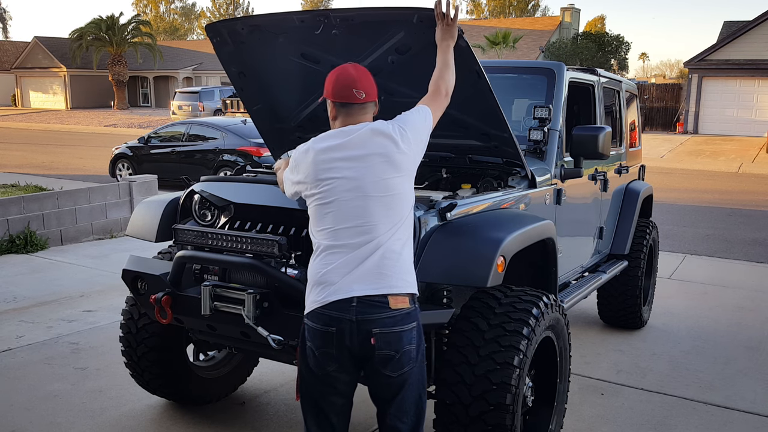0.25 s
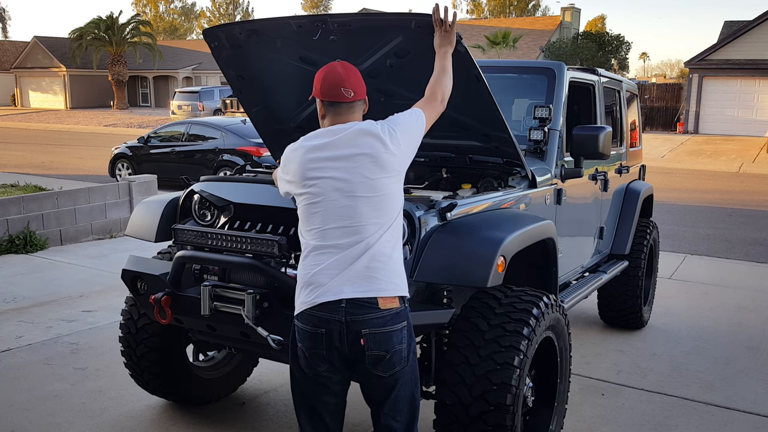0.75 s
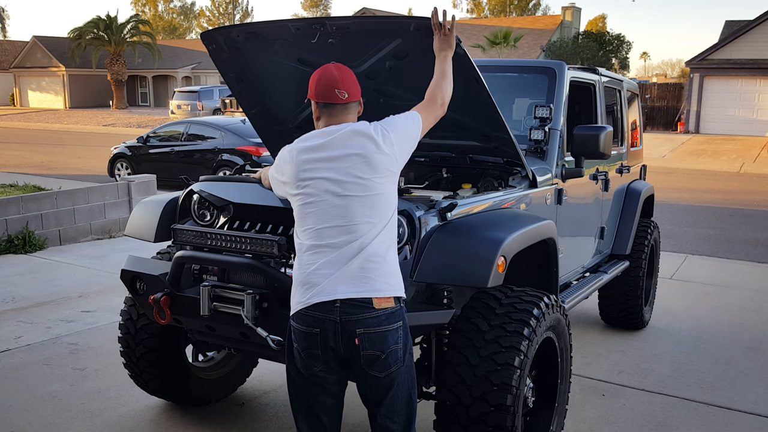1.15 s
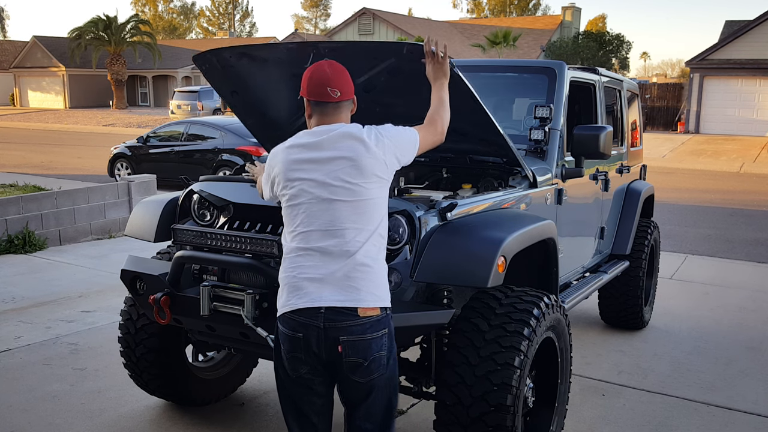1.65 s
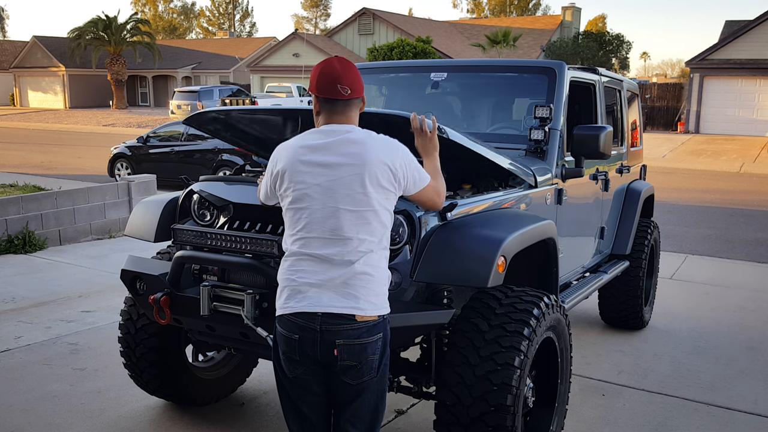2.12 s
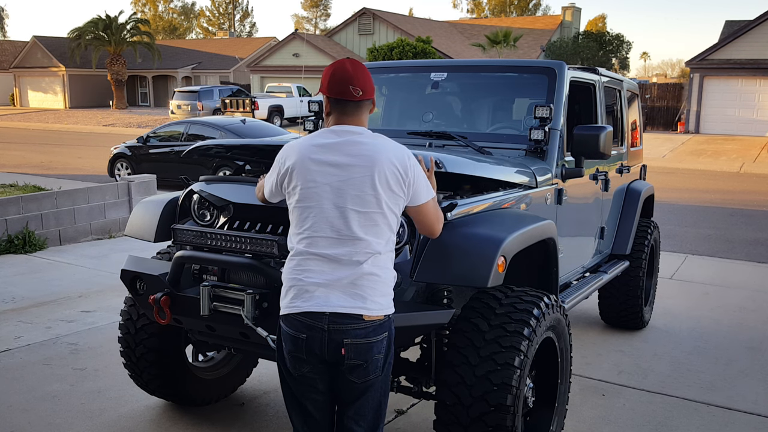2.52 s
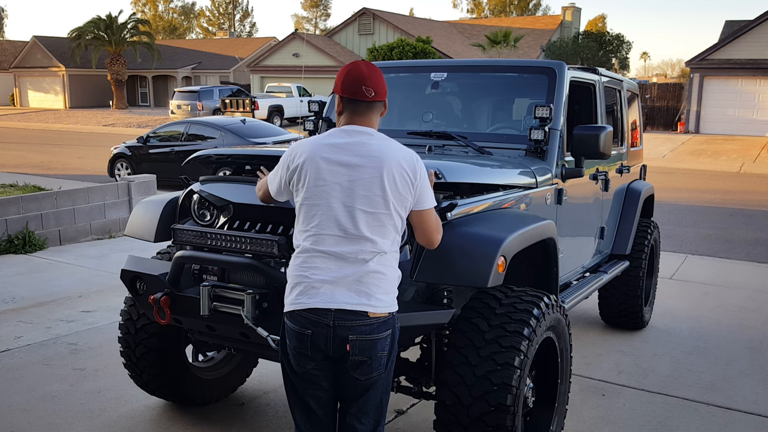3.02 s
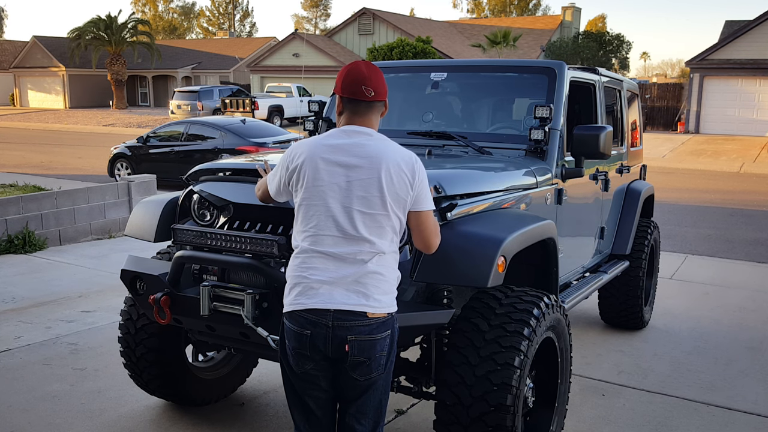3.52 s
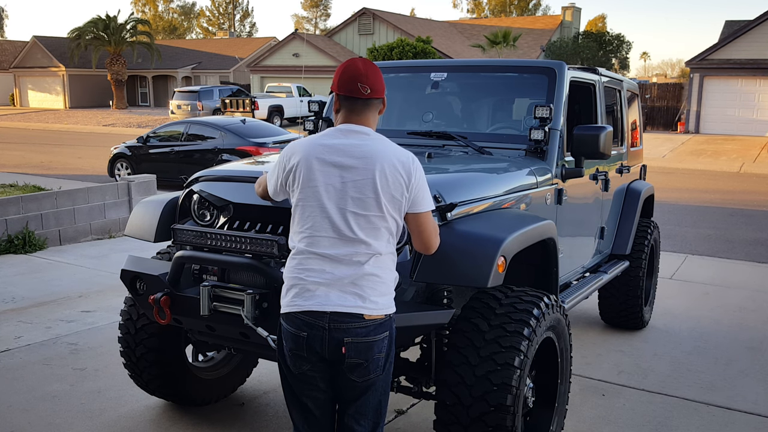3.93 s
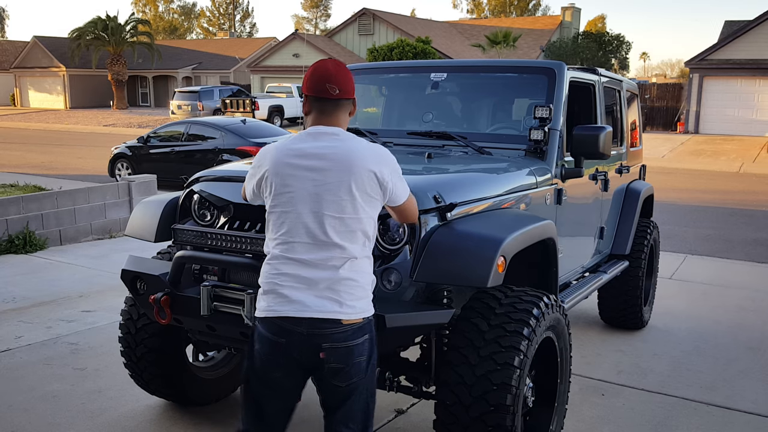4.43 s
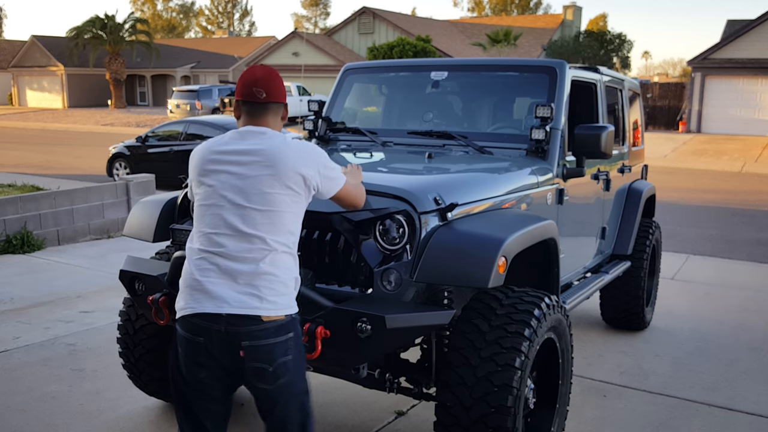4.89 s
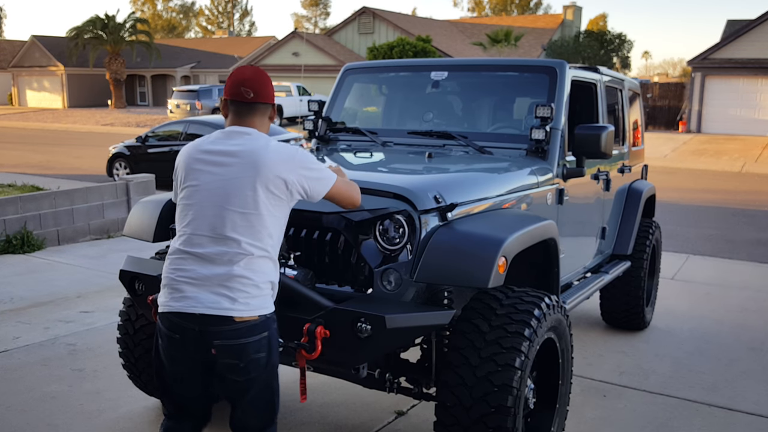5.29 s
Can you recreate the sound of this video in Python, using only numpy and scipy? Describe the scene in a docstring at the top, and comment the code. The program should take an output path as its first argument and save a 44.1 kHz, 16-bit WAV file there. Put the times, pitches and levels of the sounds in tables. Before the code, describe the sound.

On a quiet suburban driveway, light metal handling noises lead to the bright clank of a hood's prop rod. About two seconds later the car hood slams shut, latching with a deep thud and a brief rebound. Shoes scuff softly, clothing rustles faintly and a hand knocks lightly on the hood. The sounds are fairly close, with short reflections from house walls and a low hum of far traffic.

```python
"""Closing a car hood on a driveway

A man unhooks the steel prop rod and drops it with a clank. The hood falls, hits the latch and booms on
its rubber stops. He shifts his feet and knocks lightly on the hood. Each blow is ringing metal modes
plus a noise clatter. House walls scatter the sound over the traffic murmur of a quiet suburb."""
import sys
import numpy as np
from scipy import signal
from scipy.fft import rfft, irfft, next_fast_len
from scipy.io import wavfile
from scipy.ndimage import uniform_filter1d

SR = 44100
rng = np.random.default_rng(int(sys.argv[2]) if len(sys.argv) > 2 else 0)


def master(y):
    """Save y as 16-bit WAV."""
    cut = np.clip(np.atleast_2d(y).T, -1, 1)
    pcm = np.round(cut * 32767)  # scale
    wavfile.write(sys.argv[1], SR, pcm.astype(np.int16))


N = 244843
TIME_S = np.arange(N) / SR
RING_S = np.arange(SR) / SR
STEPS_FROM_S, STEPS_TO_S = 3.9, 5.5

# Impacts. Each row: start in seconds, clatter level in dB, ring level in dB, low-pass cutoff in Hz.
HOOD_HITS = [(3.6215, -27.5, -32.5, 12000), (3.639, -32.5, -38.5, 500), (3.7055, -40.5, -49.5, 4000),
             (3.748, -40.5, -55, 490), (3.785, -52.5, -68, 700)]
LATCH_HITS = [(3.5705, -34.5, -36, 16000), (3.575, -30, -68, 16000), (3.588, -29, -47, 3030)]
ROD_HITS = [(1.3692, -39, -69, 16000), (1.3713, -20.5, -29.5, 12000), (1.3765, -26.5, -59, 15000),
            (1.3815, -26, -59, 9000), (1.408, -31, -74, 7000), (1.437, -36, -53, 3000)]
KNOCK_HITS = [(5.071, -55.5, -76, 16000), (5.0895, -43.5, -42, 12000), (5.099, -48, -48.5, 8000),
              (5.112, -44.5, -60, 8000), (5.142, -51.5, -69, 8000)]
# Modes of the struck metal. Each row: frequency in Hz, relative level in dB, T60 in seconds.
HOOD_RESONANCES = [(54, -26, 0.74), (106.8, -19, 0.49), (160.4, -12.5, 0.56), (186, -12, 0.35),
                   (242, -12.5, 0.65), (280, -4, 0.12), (382.3, -9, 0.46), (458.5, -3.5, 0.28),
                   (525, -7, 0.12), (570, -3, 0.11), (632, -0.5, 0.2), (700, -26, 0.15), (896, -9.5, 0.23),
                   (1390, -21, 0.2), (3100, -16, 0.11), (4500, -17.5, .15)]
LATCH_RESONANCES = [(106.9, -10.5, 0.92), (150, -35, .2), (275.6, -4, 0.41), (547, 10, 0.076),
                    (703, -1.5, 0.27), (1280, -9, 0.082), (1300, -13, 0.14), (2050, -3.5, 0.091),
                    (2370, -17, .15), (3160, -15, 0.18), (4160, -9, 0.12), (4500, -11, 0.17),
                    (4680, -12.5, 0.18)]
ROD_RESONANCES = [(112, -14, 0.31), (142.4, -4.5, 0.16), (159.4, -3.5, 0.42), (183, -13, 0.47),
                  (227, -13.5, 0.49), (262, 0, 0.16), (355, 0.5, 0.23), (415.6, -12, 0.59), (448, -6, 0.33),
                  (577, -12, 0.19), (773, -10, 0.16), (926, -13, 0.21), (1047, -15, 0.22),
                  (1537, 5.5, 0.035), (1610, -13, 0.12), (1870, -8, 0.15), (1885, 0, 0.091),
                  (2218, 7, 0.064), (2630, -29, 0.23), (2940, -7, 0.12), (3055, -10, 0.17),
                  (4080, -28, 0.18), (4730, -16, 0.15), (6800, -16, .11), (7700, -20, 0.087)]
KNOCK_RESONANCES = [(167, -7, 0.084), (256, -0.5, 0.2), (370, 0.5, 0.086), (820, -19, 0.11),
                    (1018, -7, 0.16), (1276, 0.5, 0.11), (1490, 0.5, 0.076), (1690, -5, 0.072),
                    (1880, -9.5, 0.14)]
# Dense, short vibration of each contact. Each row: frequency in Hz, relative density in dB.
HOOD_SPECTRUM = [(47, -48), (80, -42), (107, -14), (241, -19.5), (314, -3), (391, -15.5), (456, -9.5),
                 (649, -15), (725, -20), (903, -21), (1310, -26.5), (15500, -60)]
LATCH_SPECTRUM = [(59, -39), (100, -17), (166, -31), (306, -12), (429, -15.5), (712, -3.5), (977, -23.5),
                  (1260, -11), (1690, -19), (2130, -16.5), (2690, -24), (5400, -25), (8410, -26),
                  (9950, -39.5), (15500, -33)]
ROD_SPECTRUM = [(70, -9), (110, -5), (150, -2.5), (270, -6), (450, -9), (650, -9), (900, -11), (1150, -15),
                (1500, -10), (2150, -11), (3800, -21), (8300, -25.5), (9700, -37.5), (15500, -29)]
KNOCK_SPECTRUM = [(59, -55), (100, -28), (184, -8), (275, -14), (319, -18), (378, -8), (438, -9.5),
                  (1040, -6), (1180, -11), (1290, -4), (2470, -14.5), (5280, -25), (8230, -21.5),
                  (15500, -42)]
TICK_SPECTRUM = [(500, -16), (1500, -1), (2700, 1.5), (4800, -5.5), (7000, -3), (8500, 1), (10000, -16),
                 (15500, -16)]
# Stereo balance. Each row: frequency in Hz, left over right in dB.
HOOD_PAN = [(60, 1.0), (110, 1.0), (200, 1.6), (380, 0.5), (700, 2.6), (1290, 3.0), (2380, 7.5),
            (4400, 0.5), (8120, 3.5), (15000, 4.5)]
ROD_PAN = [(60, -5), (110, 3), (200, 0.5), (380, 1), (700, 2.5), (1290, 8), (2380, 3), (4400, -2.5),
           (8120, 11), (15000, 4)]
KNOCK_PAN = [(60, 1.0), (110, 2.0), (200, 0.5), (380, 5.3), (700, 1.8), (1290, 4.3), (2380, 3.6),
             (4400, 1.7), (8120, 4.4), (15000, 4.0)]
# Hollow clunks of rod, hinges and panel. Each row: start in seconds, body level in dB,
# body centre in Hz, contact level in dB, T60 in seconds.
HANDLING_CLUNKS = [(.607, -52, 282, -63, .14), (.752, -49, 490, -59.5, 0.16), (.841, -43, 585, -55, .1),
                   (1.259, -51, 566, -79, .11), (2.918, -52, 427, -59, 0.046), (2.93, -52, 447, -57, .045),
                   (4.31, -59, 550, -70, .13), (4.654, -49.5, 580, -68, 0.057),
                   (5.314, -52, 560, -66, 0.14)]
# Scuffs of hands and soles. Each row: start in seconds, level in dB, centre in Hz, T60 in seconds.
HAND_SOLE_SCUFFS = [(.63, -55.5, 740, 0.18), (.945, -52.5, 1100, 0.1), (1.738, -58.5, 950, 0.32),
                    (1.783, -60, 1290, 0.15), (4.123, -61, 1260, .13), (4.367, -63, 1600, .08),
                    (4.542, -51.5, 1020, 0.099)]
# Metal rubbing on metal. Each row: start in seconds, level in dB, centre in Hz.
METAL_SQUEAKS = [(1.681, -59.5, 2580), (3.625, -45, 3200), (5.072, -54.5, 2080)]
# Ticks of small metal parts. Each row: start in seconds, level in dB.
METAL_TICKS = [(.838, -59), (1.541, -59), (1.577, -61), (3.204, -54.5), (4.593, -54.5), (4.613, -55.5),
               (4.862, -64), (5.407, -61)]
# Arm and body movements. Each row: peak time in seconds, swish level in dB.
BODY_MOVES = [(.01, -69.5), (.17, -65), (.33, -70), (.97, -65), (1.78, -65), (2.29, -72.5), (3.22, -67),
              (3.42, -68), (4.6, -66), (4.86, -66), (5.28, -64.5)]
# Distant traffic and hiss. Each row: frequency in Hz, relative density in dB.
SUBURB_SPECTRUM = [(15, -42), (25, -19.5), (48, -7), (69, -5), (133, -2.5), (164, -4.5), (198, -4),
                   (227, -10), (399, -10.5), (482, -11.5), (537, -12), (703, -12.5), (1380, -24.5),
                   (10400, -42.5), (15500, -35.5)]
# Left-right likeness of diffuse sound. Each row: frequency in Hz, coherence from 0 to 1.
DIFFUSE_COHERENCE = [(50, 1), (130, 0.93), (250, 0.93), (500, 0.56), (1000, 0), (2000, 0)]
# Rubbing cloth and scattered sound. Each row: frequency in Hz, relative density in dB.
CLOTH_SPECTRUM = [(200, -4), (700, 3), (2200, 1), (4500, -10.5), (8500, -9), (10000, -20.5), (15000, -21)]
SCATTER_SPECTRUM = [(60, -5.5), (200, -5.5), (600, -2.5), (2000, -3.5), (8000, 1.5), (15000, 2)]


def hood_slam():
    """The sheet-metal hood lands and rebounds, ringing its panel modes."""
    return strike(HOOD_HITS, HOOD_RESONANCES, HOOD_SPECTRUM, HOOD_PAN,
                  clatter_t60_s=0.29, direct=0.21, bass_lag_s=0.0037, highpass_hz=45)


def hood_booms():
    """The panel drums on its stops, weaker each rebound; pitch sags as the steel relaxes."""
    start_s, length_s, rebound_s = 3.629, 0.066, 0.058
    drum_hz, first_db, loss_db = 317.5, -24, 15
    progress = np.clip(RING_S / length_s, 0, 1)
    pitch_hz = drum_hz * (1 + 0.019 * (0.5 - progress))
    envelope = np.abs(np.sin(np.pi * progress)) ** 0.83
    boom = envelope * np.sin(2 * np.pi * np.cumsum(pitch_hz) / SR)
    out = np.zeros((2, N))
    for k in range(3):
        add(out, start_s + k * rebound_s, gain(first_db - k * loss_db) * boom)
    return out


def latch_hit():
    """The falling hood strikes the latch."""
    return strike(LATCH_HITS, LATCH_RESONANCES, LATCH_SPECTRUM, HOOD_PAN,
                  clatter_t60_s=0.11, direct=0.21, bass_lag_s=0.0029, highpass_hz=102)


def rod_drop():
    """The steel rod bounces on the front frame; both ring."""
    return strike(ROD_HITS, ROD_RESONANCES, ROD_SPECTRUM, ROD_PAN,
                  clatter_t60_s=0.11, direct=0.55, bass_lag_s=0.0088, highpass_hz=97.6)


def hand_knock():
    """A hand lightly rings the hood's front edge."""
    return strike(KNOCK_HITS, KNOCK_RESONANCES, KNOCK_SPECTRUM, KNOCK_PAN,
                  clatter_t60_s=0.16, direct=0.13, bass_lag_s=0.0023, highpass_hz=90)


def strike(hits, modes, spectrum, balance, clatter_t60_s, direct, bass_lag_s, highpass_hz):
    """Each hit excites clear modes and a dense clatter; softer contact passes less treble."""
    # Adjacent modes swing in opposite directions.
    ring = sum((-1) ** k * gain(db) * decay(t60_s) * np.sin(2 * np.pi * hz * RING_S)
               for k, (hz, db, t60_s) in enumerate(modes))
    ring *= attack(0.0024)
    out = np.zeros((2, N))
    for start_s, clatter_db, ring_db, cutoff_hz in hits:
        clatter = noise(spectrum, SR, direct) * decay(clatter_t60_s) * attack(0.00015)
        hit = gain(clatter_db) * clatter + gain(ring_db) * ring
        add(out, start_s, signal.lfilter(*signal.butter(2, cutoff_hz, fs=SR), hit))
    # A panel radiates little below its lowest mode.
    out = signal.sosfilt(signal.butter(3, highpass_hz, "high", fs=SR, output="sos"), out)
    # Long bending waves travel slowly, so the bass lags.
    size = next_fast_len(N)
    hz = np.fft.rfftfreq(size, 1 / SR)
    lag_s = bass_lag_s / (1 + (hz / 260) ** 4)
    dispersion = np.exp(-2j * np.pi * np.cumsum(lag_s) * SR / size)
    return irfft(pan(rfft(out, size) * dispersion, log_interp(balance, hz)), size)[:, :N]


def handling():
    """Light contacts as noise bursts: clunks, scuffs, squeaks, ticks and grit underfoot."""
    out = np.zeros((2, N))
    for start_s, body_db, hz, contact_db, t60_s in HANDLING_CLUNKS:
        add(out, start_s, gain(body_db) * burst(hz, t60_s, width_oct=0.48, direct=0.66))
        add(out, start_s, gain(contact_db) * burst(1490, t60_s, width_oct=0.7, direct=0.4))
    for start_s, db, hz, t60_s in HAND_SOLE_SCUFFS:
        add(out, start_s, gain(db) * burst(hz, t60_s, width_oct=0.62, direct=0.35))
    for start_s, db, hz in METAL_SQUEAKS:
        add(out, start_s, gain(db) * burst(hz, t60_s=0.089, width_oct=0.13, direct=0.94))
    grit = [(STEPS_FROM_S + when * (STEPS_TO_S - STEPS_FROM_S), -66 - 8 * weakness)
            for when, weakness in rng.random((6, 2))]
    for start_s, db in list(METAL_TICKS) + grit:
        add(out, start_s, gain(db) * noise(TICK_SPECTRUM, SR, direct=0.2) * decay(t60_s=0.039))
    return pan(out, left_db=2)


def clothing():
    """Cloth swishes with each move over a faint uneven rub, stronger once he starts stepping."""
    rise_s, t60_s, fidget_db, stepping_db = 0.079, 0.75, -80, -75.5
    stepping = np.clip((TIME_S - STEPS_FROM_S) / rise_s, 0, 1)
    power = gain(fidget_db) ** 2 + gain(stepping_db) ** 2 * stepping
    for peak_s, db in BODY_MOVES:
        age_s = TIME_S - peak_s
        swish = np.exp(np.minimum(age_s / rise_s, -np.log(1000) * age_s / t60_s))
        power += (gain(db) * swish) ** 2
    rub = noise(CLOTH_SPECTRUM, N, direct=0.087) * np.sqrt(power)
    return pan(rub * gain(1.65 * wander(rate_hz=110)), left_db=3.5)


def driveway(x):
    """Car, concrete and house front scatter the sound; houses opposite add a faint long tail."""
    wet_db, far_db = -7, -17.5
    scatter = noise(SCATTER_SPECTRUM, SR)
    low = signal.sosfiltfilt(signal.butter(2, 3200, fs=SR, output="sos"), scatter)
    body = signal.sosfiltfilt(signal.butter(2, 8500, fs=SR, output="sos"), scatter)
    near = body * decay(t60_s=0.4) + (scatter - body) * decay(t60_s=0.21)
    far = gain(far_db) * low * decay(t60_s=0.77)
    tail = (near + far) * np.clip((RING_S - 0.004) / 0.011, 0, 1)
    tail /= np.sqrt(np.sum(tail ** 2) / 2)
    return x + gain(wet_db) * signal.fftconvolve(x.mean(axis=0)[None], tail, axes=1)[:, :N]


def suburb():
    """Far traffic wavers in the bass and slowly draws nearer; the hiss stays steady."""
    level_db, rise_db_per_s = -59, 0.29
    murmur = noise(SUBURB_SPECTRUM, N)
    traffic = signal.lfilter(*signal.butter(1, 600, fs=SR), murmur)
    swell_db = -0.5 + rise_db_per_s * TIME_S + 0.8 * wander(rate_hz=5.47)
    return gain(level_db) * pan(murmur + traffic * (gain(swell_db) - 1), left_db=1.35)


def burst(centre_hz, t60_s, width_oct, direct):
    """A light touch: one band of noise, fast rise, exponential decay."""
    hz = np.geomspace(20, 20000, 120)
    offset = np.log2(hz / centre_hz) / width_oct
    band_db = -20 * np.log10(1 + offset ** 2 + offset ** 4 / 10)
    return noise(np.c_[hz, band_db], SR, direct) * decay(t60_s) * attack(0.0011)


def noise(spectrum, size, direct=0):
    """Stereo noise, RMS 1. The direct share is coherent, the rest only at low frequencies."""
    hz = np.fft.rfftfreq(size, 1 / SR)
    coherence = np.clip(direct + (1 - direct) * log_interp(DIFFUSE_COHERENCE, hz), 0, 1)
    shaped = rfft(rng.standard_normal((2, size))) * gain(log_interp(spectrum, hz)) * (hz > 0)
    mid, side = shaped * np.sqrt([1 + coherence, 1 - coherence])
    x = irfft([mid + side, mid - side], size)
    return x / x.std()


def wander(rate_hz):
    """Smooth random drift, spread near 1."""
    hold = int(SR / rate_hz)
    return uniform_filter1d(np.repeat(rng.standard_normal(N // hold + 1), hold), hold)[:N]


def attack(tau_s):
    """Exponential rise to 1."""
    return 1 - np.exp(-RING_S / tau_s)


def decay(t60_s):
    """Exponential decay."""
    return np.exp(-np.log(1000) * RING_S / t60_s)


def gain(db):
    """Decibels to amplitude."""
    return 10 ** (np.asarray(db) / 20)


def log_interp(points, hz):
    """Interpolate (Hz, value) rows over log frequency."""
    points_hz, values = np.transpose(points)
    return np.interp(np.log(hz + 1e-6), np.log(points_hz), values)


def pan(x, left_db):
    """Raise left over right by left_db."""
    return x * gain(np.array([[0.5], [-0.5]]) * left_db)


def add(out, start_s, x):
    """Mix x into out at start_s."""
    i = int(start_s * SR)
    out[:, i:i + x.shape[-1]] += x[..., :N - i]


def scene():
    """Impacts and handling with driveway reverb, plus dry booms, clothing and suburb."""
    car = rod_drop() + latch_hit() + hood_slam() + hand_knock() + handling()
    car[1] = np.roll(car[1], 3)  # car slightly left: the right channel lags
    return driveway(car) + hood_booms() + clothing() + suburb()


def record(dry):
    """Steep low-pass at 15750 Hz."""
    return signal.sosfilt(signal.ellip(10, 0.2, 70, 15750, fs=SR, output="sos"), dry)


dry = scene()
out = record(dry)
master(out)
```